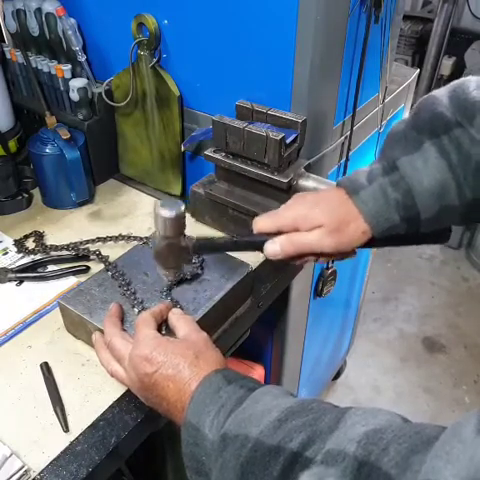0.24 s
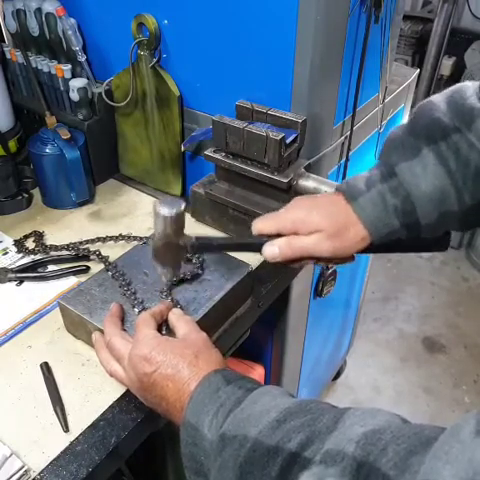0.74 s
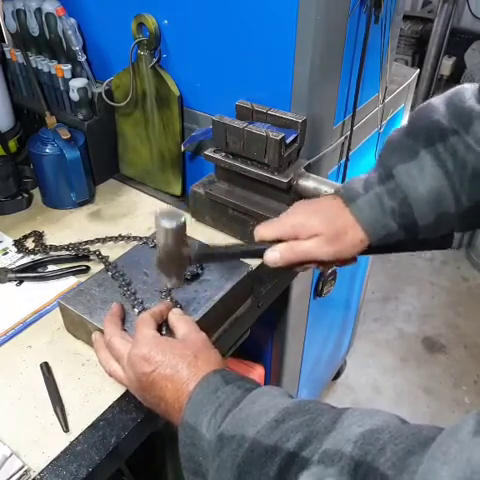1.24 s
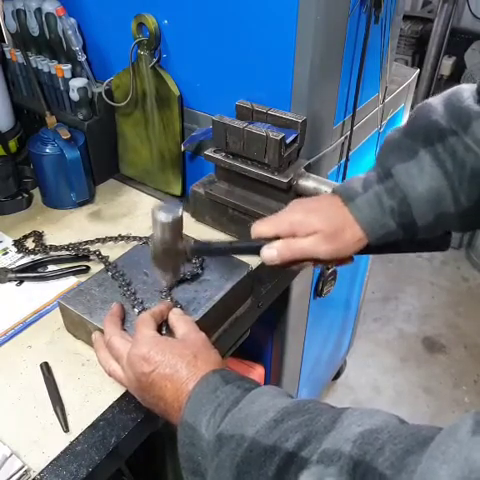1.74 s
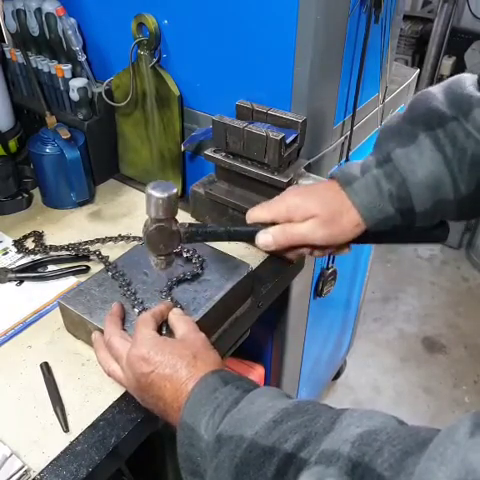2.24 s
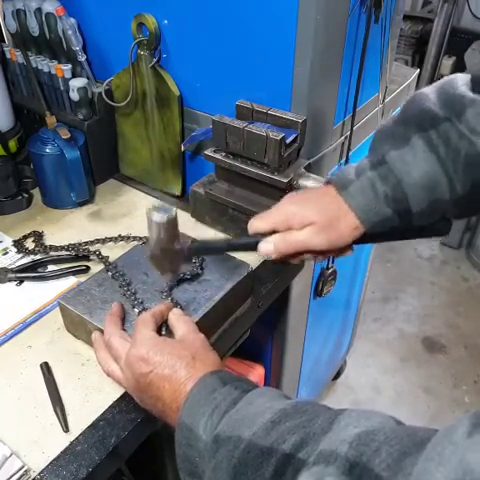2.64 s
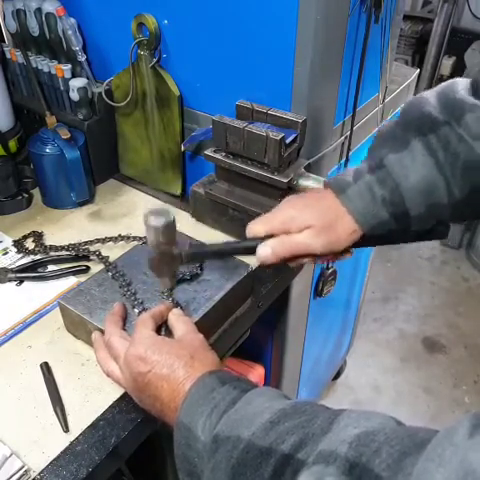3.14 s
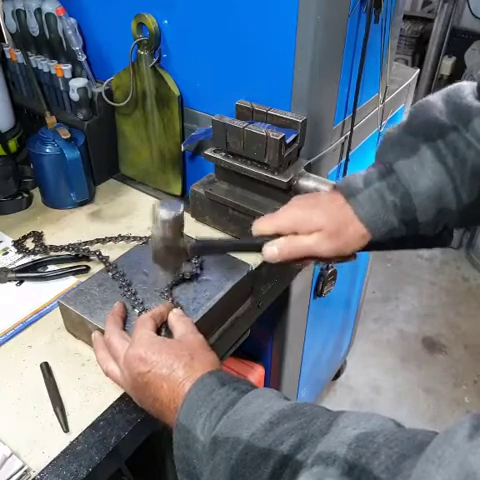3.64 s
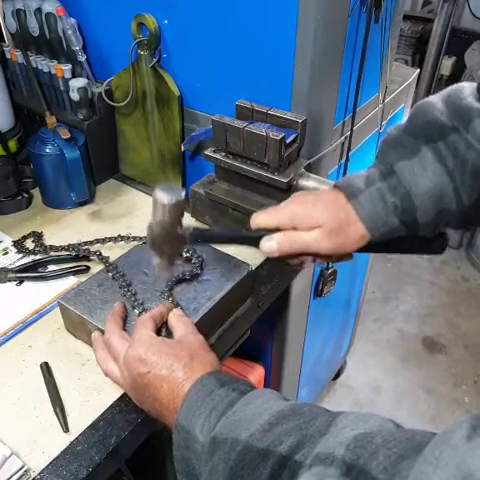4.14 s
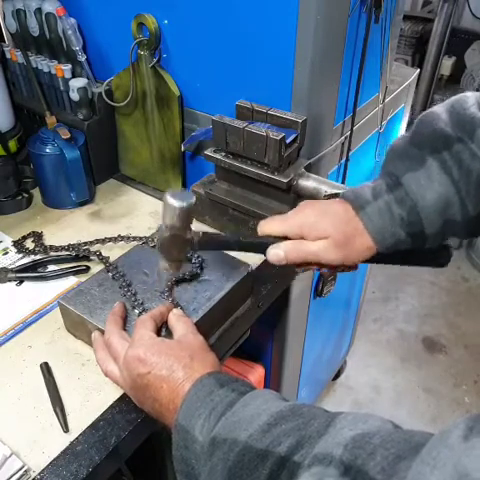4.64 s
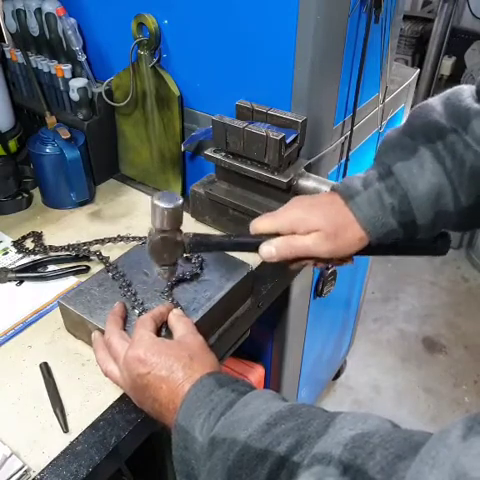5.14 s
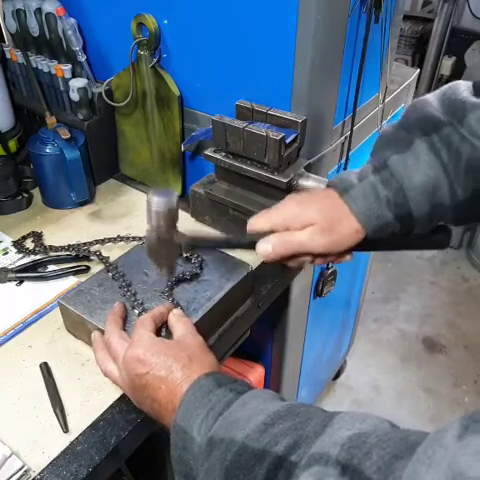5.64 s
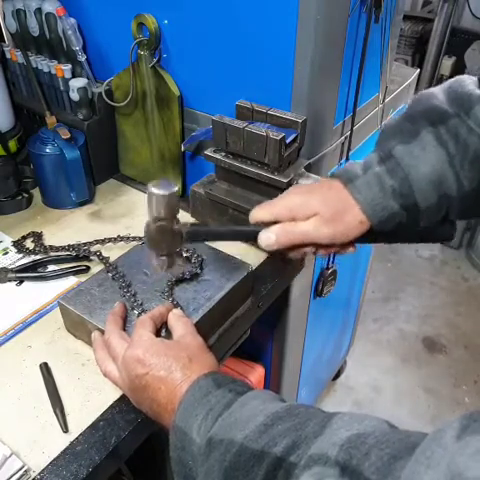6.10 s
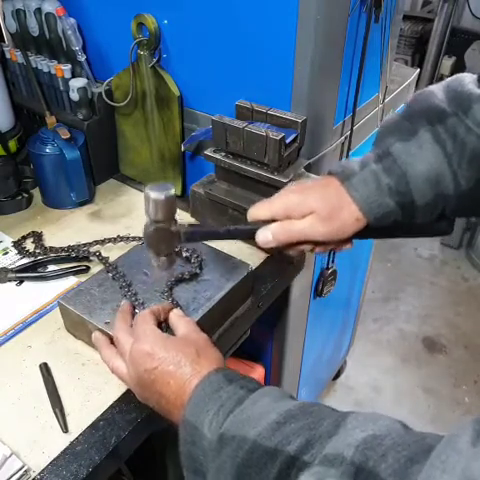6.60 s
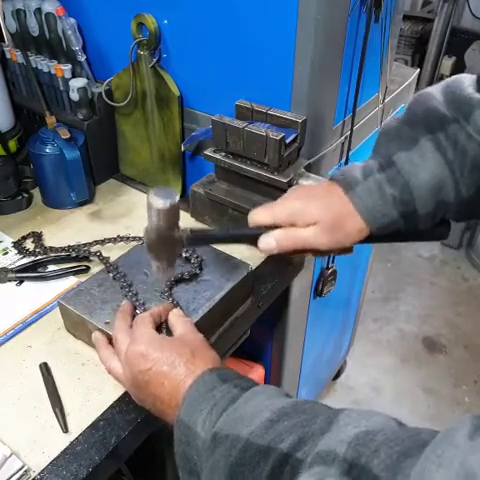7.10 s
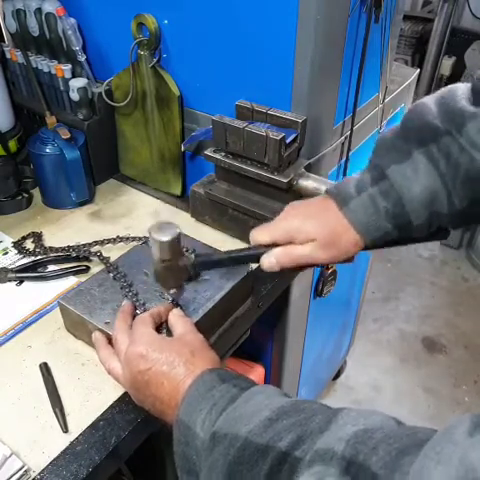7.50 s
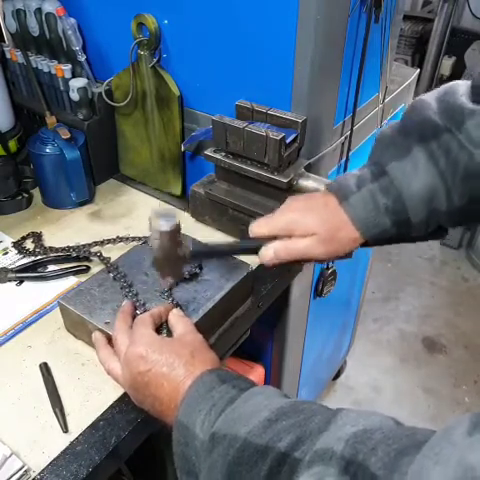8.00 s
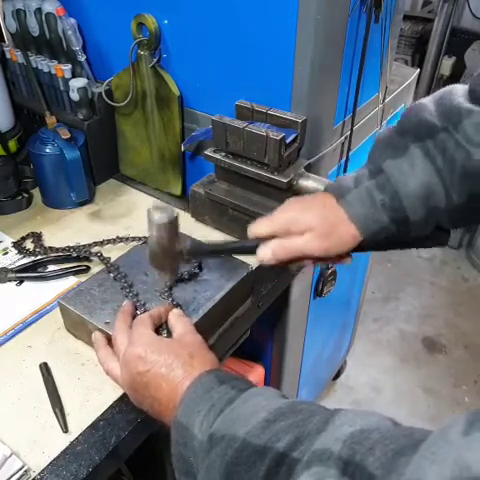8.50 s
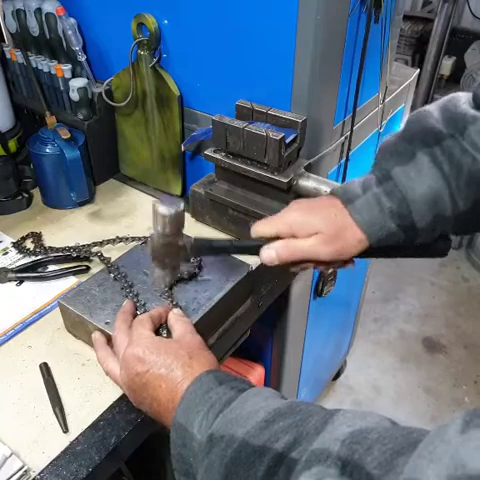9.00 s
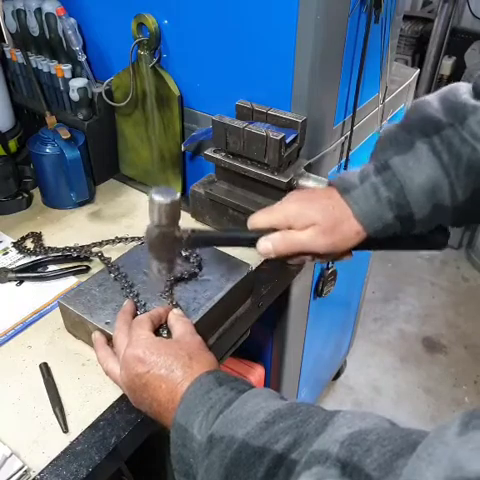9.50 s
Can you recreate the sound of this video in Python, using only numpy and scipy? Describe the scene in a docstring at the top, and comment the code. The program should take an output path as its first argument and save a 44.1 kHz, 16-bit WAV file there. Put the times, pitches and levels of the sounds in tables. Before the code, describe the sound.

A small hammer taps a chain rivet on a steel block, about four bright clinks a second, each with a solid bench knock.

```python
"""Hammering a chain rivet

A small hammer peens a chain rivet on a steel block, about four taps a second, close to the microphone.
The block drives the wooden bench: a set of fading sine waves gives the same basic knock at every tap.
Short noise bursts make the bright clink, the sizzle of the links and the chain's small shifts.
Fading noise and slower sines make the small workshop's answer, over a faint steady rumble."""
import sys
import numpy as np
from scipy import signal
from scipy.fft import rfft, irfft, next_fast_len
from scipy.io import wavfile

SR = 44100
rng = np.random.default_rng(int(sys.argv[2]) if len(sys.argv) > 2 else 0)


def master(y):
    """Save y as 16-bit WAV."""
    cut = np.clip(np.atleast_2d(y).T, -1, 1)
    pcm = np.round(cut * 32767)  # scale
    wavfile.write(sys.argv[1], SR, pcm.astype(np.int16))


N = 429975
AGE = np.arange(SR // 2) / SR  # seconds since a sound began
SHORT = SR // 4  # length of a short sound, in samples


def amp(db):
    """Turn decibels into gain."""
    return 10 ** (np.asarray(db) / 20)


def unit(x):
    """Scale to an rms level of 1."""
    return x / np.sqrt(np.mean(x ** 2) + 1e-20)


def along(points, hz):
    """Read a curve of (pitch_hz, value) points on a logarithmic pitch axis."""
    point_hz, value = np.transpose(points)
    return np.interp(np.log(hz + 1), np.log(point_hz + 1), value)


def filtered(x, response):
    """Multiply the spectrum of x by a response that depends on frequency."""
    size = x.shape[-1]
    padded = next_fast_len(size + 1024, True)
    spectrum = rfft(x, padded) * response(np.fft.rfftfreq(padded, 1 / SR))
    return irfft(spectrum, padded)[..., :size]


def add(track, start_s, sound):
    """Mix a sound into the track, cutting off what lies outside it."""
    start = round(start_s * SR)
    part = sound[:, max(-start, 0):N - start]
    track[:, max(start, 0):][:, :part.shape[1]] += part


def noise(size):
    """Two independent channels of white noise."""
    return rng.standard_normal((2, size))


def dense(size=1024, count=3):
    """Two washes like crowded resonances: noise made even over time and frequency."""
    x = noise(len(AGE))
    for _ in range(count):
        z = signal.stft(x, nperseg=size)[2]
        only_phase = np.exp(1j * np.angle(z))
        x = signal.istft(only_phase, nperseg=size)[1][:, :len(AGE)]
    return x


def stereo(pair, spectrum, apart, left_db):
    """Colour two noises and share them left and right: bass alike, treble partly unrelated."""
    def mid_and_side(hz):
        turn = apart * hz ** 2 / (hz ** 2 + 420 ** 2)
        return amp(along(spectrum, hz)) * [np.cos(turn), np.sin(turn)]

    mid, side = filtered(pair, mid_and_side)
    balance = amp([[left_db / 2], [-left_db / 2]])
    return unit(np.array([mid + side, mid - side]) * balance)


def dying(x, t60s):
    """Let each frequency fade at its own speed."""
    hz, t, z = signal.stft(x, SR, nperseg=256)
    fading = z * amp(-60 * t / along(t60s, hz)[:, None])
    return signal.istft(fading, SR, nperseg=256)[1][:, :len(AGE)]


def swell(rise, t60, size=None):
    """A build-up, then an exponential decay that loses 60 dB in t60 seconds."""
    t = AGE[:size]
    return (1 - np.exp(-t / max(rise, 1e-5))) * np.exp(-np.log(1000) * t / t60)


# Colour of the faint rumble: pitch_hz, relative level_db (per Hz)
RUMBLE_COLOUR = [(20, -31.5), (50, -1.5), (105, 0.5), (200, -6), (350, -9.5), (700, -20.5), (1500, -27),
                 (3000, -36), (8000, -40.5), (15000, -44)]


def rumble():
    """The workshop's steady background: noise strongest in the bass and on the left."""
    return amp(-57.0) * stereo(noise(N), RUMBLE_COLOUR, apart=0.59, left_db=6)


# The chain sliding and ticking on the block: start_s, level_db, rise_s, t60_s (60 dB fade), centre_hz
CHAIN_SHIFTS = [(5.208, -35, 0.017, 0.29, 3550), (5.69, -47, .02, 0.25, 5000),
                (6.226, -38.5, 0.0044, 0.28, 7600), (6.521, -45.5, 0.0049, 0.39, 8900)]


def chain():
    """Links slide a little on the block: each slide is a fading burst of coloured noise."""
    track = np.zeros((2, N))
    for start_s, level_db, rise, t60, hz in CHAIN_SHIFTS:
        band = [(hz / 16, -10), (hz / 5, 2), (hz, 0), (hz * 2, -10), (hz * 4, -34)]
        slide = stereo(noise(len(AGE)), band, apart=0.86, left_db=1.5)
        add(track, start_s, amp(level_db) * swell(rise, t60) * slide)
    return track


# Crowded upper resonances of bench and tools: pitch_hz, relative level_db (per Hz)
CLATTER_COLOUR = [(100, -26.5), (300, -4.5), (420, 0), (550, -5.5), (720, -3.5), (900, -1.5), (1150, -4.5),
                  (1500, 1.5), (2000, -1), (2500, -5), (3300, -9.3), (4500, -16), (7000, -35.5),
                  (15000, -57)]
# The walls' answer: pitch_hz, relative level_db (per Hz)
WALL_COLOUR = [(30, -30.5), (70, -10), (120, -4.5), (180, -8.5), (290, 0), (430, -3), (620, 0), (790, -2.5),
               (1080, 2), (1600, -5), (2000, -7), (2600, -11.5), (3500, -25.5), (8000, -45.5)]
# How fast the walls' answer fades, before a slow extra decay: pitch_hz, t60_s
WALL_FADE = [(100, 0.46), (300, 0.27), (1000, 0.26), (3000, 0.35), (8000, 0.1)]
# The late room sound: pitch_hz, relative level_db (per Hz)
LATE_COLOUR = [(40, -17), (100, 1.5), (300, 5), (600, -0.5), (1200, -2), (1700, -8.5), (2500, -13.5),
               (3500, -22.5), (7000, -29), (13000, -52.5)]
# Slower resonances of the workshop and things on the bench: pitch_hz, relative level_db, t60_s
LINGERING_MODES = [(55, -44, .8), (115, -14.5, .2), (140.1, -34, 0.36), (162.4, -37, 0.59),
                   (213.3, -25.5, 0.4), (252.1, -15.5, 0.23), (280.05, -16.5, 0.27), (314, -33.5, 0.67),
                   (599, -26.5, .3), (658, -30.5, .29), (772, -27.5, .2), (838, -22.5, 0.11),
                   (920, -16.5, .15), (1050, -35, .42), (1061, -6.5, 0.08), (1411, -34.5, .38),
                   (1516, -27, .22), (1994, -24, 0.19), (2730, -33.5, 0.26)]


def surroundings():
    """Clatter and room sound, made once for all taps because the block stays in its place."""
    clatter = stereo(dense(size=256), CLATTER_COLOUR, apart=0.84, left_db=4.0)
    clatter = amp(-15) * swell(0.0008, 0.097) * clatter
    walls = dying(stereo(dense(size=2048), WALL_COLOUR, apart=0.88, left_db=2), WALL_FADE)
    walls = amp(-14.0) * swell(0.0065, 8.6) * walls
    late = stereo(dense(size=2048), LATE_COLOUR, apart=0.89, left_db=-0.5)
    late = amp(-27.5) * swell(0.02, 0.59) * late
    linger = np.zeros(len(AGE))
    for k, (hz, level_db, t60) in enumerate(LINGERING_MODES):
        wave = np.sin(2 * np.pi * hz * AGE)
        linger += (-1) ** k * amp(level_db) * swell(0.015, t60) * wave
    return clatter + walls + late + linger


def late_swell(thump, delay, db, edge_hz):
    """A faint, dull second swell of the bass: a delayed copy of the thump without its treble."""
    def response(hz):
        return np.exp(-2j * np.pi * hz * delay) / (1 + (hz / edge_hz) ** 4)

    return amp(db) * filtered(thump, response)


# Resonances of the bench under the block:
# pitch_hz, relative level_db, t60_s, arrival_s, lead_rad (how far the left wave is ahead of the right)
BENCH_MODES = [(131.7, -8.3, 0.059, 0.002, 0.65), (255.9, -13, 0.17, 0.0068, 0.32),
               (280.83, -11.5, 0.19, 0.0093, 0.14), (321, -5, 0.092, 0.0083, -0.5),
               (406, -3.7, 0.025, 0.0025, 0.3), (456, -22, 0.13, 0.0012, 1.46),
               (552.5, -5, 0.049, 0.0042, 2), (603, -6, 0.048, 0.0024, 1.0), (682.8, -12, 0.075, 0, 2.05),
               (932, -8.5, 0.051, 0.0025, 1.5), (976, -15, 0.12, 0.0002, -2.5),
               (1065, -10, 0.13, 0.00019, 1.56), (1104, -2.3, 0.045, 0.001, 1.07),
               (1239, -16.5, 0.094, 0.0038, 1.2), (1417, -12, 0.037, 0.00025, 0.5),
               (1478, -3, 0.031, 0, 0.5), (1509, -10.5, 0.06, 0.0015, 1), (1609, -14, 0.081, 0.00043, 0),
               (1682, -10, 0.059, 0, -1), (1744.5, -20, 0.13, 0.0028, 1.0),
               (1860, -20.5, 0.08, 0.0021, 2.5), (1920, -10.5, 0.035, 0, -1.9),
               (2256, -15, 0.052, 0.0039, 1.2), (2412, -18.5, 0.05, 0.00025, 1.6),
               (2628, -14, 0.018, 0.0025, 0.8)]


def bench_modes():
    """Each bench resonance is a fading sine; low ones build up slower, neighbours start in opposite directions."""
    ears = np.array([[1 / 2], [-1 / 2]])  # left, right
    modes = []
    for k, (hz, level_db, t60, arrival, lead) in enumerate(BENCH_MODES):
        t = np.maximum(AGE - arrival, 0)
        envelope = (1 - np.exp(-t * hz / 1.57)) * np.exp(-np.log(1000) * t / t60)
        wave = np.sin(2 * np.pi * hz * t + lead * ears)
        modes.append((-1) ** k * amp(level_db + 1.5 * ears) * envelope * wave)
    return amp(0.1) * np.array(modes)


# A harder tap makes a shorter contact and so a brighter knock:
# pitch_hz, extra_db (per dB of strength)
HARDNESS_COLOUR = [(120, -0.33), (300, -0.05), (1050, 0), (1600, .2), (2600, 0.73)]
KNOCK_DB, RATTLE_DB = -.45, -20.3  # gain of the whole knock, and of the rattle within it
THUMP_EDGE_HZ = 600  # a glancing tap moves the bench less below this
MODE_SCATTER_DB = .9  # no two taps land on quite the same spot


def knock(modes, room, force_db, square_db):
    """Bench and room answer: brighter for a harder tap, fuller for a squarer one, with a new rattle each time."""
    mode_gains = amp(rng.normal(0, MODE_SCATTER_DB, len(modes)))
    sound = np.einsum("m,mct->ct", mode_gains, modes) + room
    rattle = stereo(noise(SHORT), CLATTER_COLOUR, apart=0.64, left_db=-1)
    sound[:, :SHORT] += amp(RATTLE_DB) * swell(0.0022, 0.19, size=SHORT) * rattle

    def response(hz):
        hardness_db = force_db * along(HARDNESS_COLOUR, hz)
        fullness_db = square_db / (1 + (hz / THUMP_EDGE_HZ) ** 4)
        return amp(hardness_db + fullness_db)

    return amp(KNOCK_DB) * filtered(sound, response)


def steel(spectrum, crack_db, crack_t60, tail_db, tail_t60, ripple_db):
    """A noise click with a tail; its uneven colour is drawn anew at random each time."""
    hz = np.linspace(100, 16000, num=140)
    ripple = ripple_db * rng.standard_normal(len(hz))
    colour = np.column_stack([hz, along(spectrum, hz) + ripple])
    left_right_db = np.array([[1.5], [-1.5]])  # the direct click favours the left
    crack = amp(crack_db + left_right_db) * swell(0.00034, crack_t60, size=SHORT)
    tail = amp(tail_db) * swell(0.0018, tail_t60, size=SHORT)
    return np.hypot(crack, tail) * stereo(noise(SHORT), colour, apart=0.79, left_db=0.5)


# Colour of hammer steel on rivet steel: pitch_hz, relative level_db (per Hz)
CLINK_COLOUR = [(1500, -46), (3000, 1), (4200, -1.5), (5400, -5), (6700, -3.5), (8000, -6.5),
                (10000, -10.5), (15000, -34)]
CLINK_DB, CLINK_GROWS = -28, 0.57  # gain on a firm tap; extra dB per dB of strength


def clink(force_db):
    """The hammer's face on the rivet: a bright noise click that grows faster than the knock."""
    gain = amp(CLINK_DB + CLINK_GROWS * force_db)
    return gain * steel(CLINK_COLOUR, crack_db=1, crack_t60=0.065, tail_db=0.5, tail_t60=.23, ripple_db=2)


# Colour of the chattering links, before the moving peak: pitch_hz, relative level_db (per Hz)
SIZZLE_COLOUR = [(4000, -35), (7000, -11.5), (8600, -1), (10000, -1.5), (11000, 2.5), (12500, -1),
                 (13500, 0.5), (14500, -5.5)]
SIZZLE_DB = 0.5  # gain of the layer
# A broad peak that moves as the links turn
SIZZLE_HZ, SIZZLE_SCATTER_HZ, SIZZLE_WIDTH_HZ, SIZZLE_PEAK_DB = 10600, 500, 1600, 2
SIZZLE_USUAL_DB, SIZZLE_HZ_PER_DB = -29, 160.5  # louder chatter is also higher


def sizzle(db):
    """The links chatter against the block: hissing noise, higher when louder, its peak a little random."""
    scatter = SIZZLE_SCATTER_HZ * rng.standard_normal()
    centre = SIZZLE_HZ + SIZZLE_HZ_PER_DB * (db - SIZZLE_USUAL_DB) + scatter
    bright = []
    for hz, level_db in SIZZLE_COLOUR:
        peak = np.exp(-((hz - centre) / SIZZLE_WIDTH_HZ) ** 2)
        bright.append((hz, level_db + SIZZLE_PEAK_DB * peak))
    chatter = steel(bright, crack_db=8.5, crack_t60=0.013, tail_db=-7.5, tail_t60=.2, ripple_db=4.5)
    return amp(SIZZLE_DB + db) * chatter


# The hammer taps, all levels relative:
# start_s (nominal time), strength_db, sizzle_db (chattering links), thump_db (bench)
HAMMER_TAPS = [(0.211, -8, -31.5, -19), (0.46, -4, -33, -15.5), (0.713, -4, -30.5, -16),
               (0.952, -7, -21.5, -20), (1.249, -7, -27.5, -17), (1.501, -3.5, -29.5, -15),
               (1.736, -2, -31, -14.5), (1.974, -1.5, -34, -14), (2.218, -1, -31, -14),
               (2.443, -1, -26.5, -15), (2.671, -4.5, -20.5, -19), (2.937, -7.5, -23.5, -27),
               (3.198, -2, -26.5, -15), (3.43, -2, -29, -14.5), (3.669, -2, -27, -14.5),
               (3.898, -3, -25.5, -14), (4.14, -2, -35, -14), (4.387, -2, -30.5, -14.5),
               (4.62, -3.5, -29, -15), (4.855, -1, -27.5, -14), (5.088, -2, -24.5, -14),
               (5.333, -2.5, -31, -16), (5.571, -2, -34, -14.5), (5.803, -1.5, -32.5, -14.5),
               (6.046, -3.5, -32, -16), (6.317, -3.5, -36, -16), (6.568, -5, -33, -17.5),
               (6.865, -2, -32.5, -15), (7.106, -1.5, -31, -14), (7.344, -3, -25.5, -15),
               (7.58, -1, -29, -13.5), (7.813, -1.5, -24.5, -14), (8.037, -1, -24.5, -13),
               (8.284, -5, -30, -15.5), (8.54, -6, -24, -20), (8.771, -3, -31.5, -17),
               (9.006, -3.5, -23.5, -16), (9.228, -2.5, -23, -15), (9.452, -2.5, -29, -15),
               (9.684, -1.5, -25.5, -14)]
FIRM_DB = -2.5  # strength of an ordinary firm tap
KNOCK_LAG_S, STEEL_LAG_S = 0.001298, 0.001102  # small fixed delay from the listed time to each sound
EARLIER_S, EARLIER_DB = -.16, -8.5  # the room still rings from an earlier tap


def hammering():
    """Strength sets level and colour of knock and clink; the sizzle depends on how the links lie."""
    track = np.zeros((2, N))
    modes = bench_modes()
    room = surroundings()
    room = room + late_swell(modes.sum(axis=0), delay=.116, db=-28, edge_hz=260)
    usual_thump_db = np.median([thump_db - db for _, db, _, thump_db in HAMMER_TAPS])
    for start_s, db, sizzle_db, thump_db in HAMMER_TAPS:
        force_db = db - FIRM_DB
        square_db = thump_db - db - usual_thump_db  # above 0: a squarer tap, a fuller thump
        add(track, start_s + KNOCK_LAG_S, amp(db) * knock(modes, room, force_db, square_db))
        add(track, start_s + STEEL_LAG_S, amp(db) * clink(force_db) + sizzle(sizzle_db))
    add(track, EARLIER_S, amp(EARLIER_DB) * room)
    return track


def scene():
    """Hammering, a little stronger on the left, with the chain's shifts and the workshop's faint rumble."""
    left_right = amp([[.35], [0]])
    return rumble() + chain() + left_right * hammering()


TOP_HZ = 14650  # upper limit of the sound


def record(dry):
    """Round off the loudest peaks, fade the deepest bass and cut steeply above the top limit."""
    rounded = dry / (1 + abs(dry) ** 6) ** (1 / 6)

    def response(hz):
        low_cut = hz ** 2 / (hz ** 2 + 22 ** 2)
        return low_cut / np.sqrt(1 + (hz / TOP_HZ) ** 200)

    return filtered(rounded, response)


dry = scene()
out = record(dry)
master(out)
```